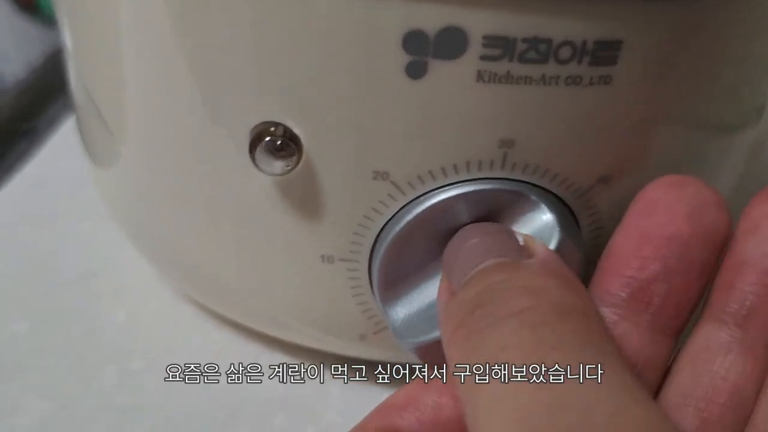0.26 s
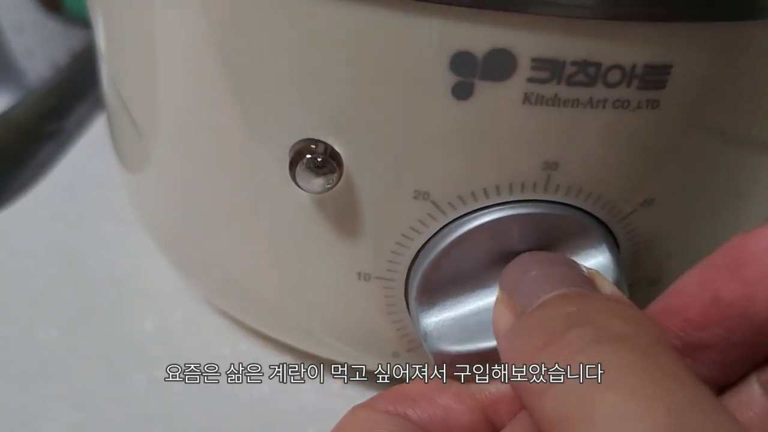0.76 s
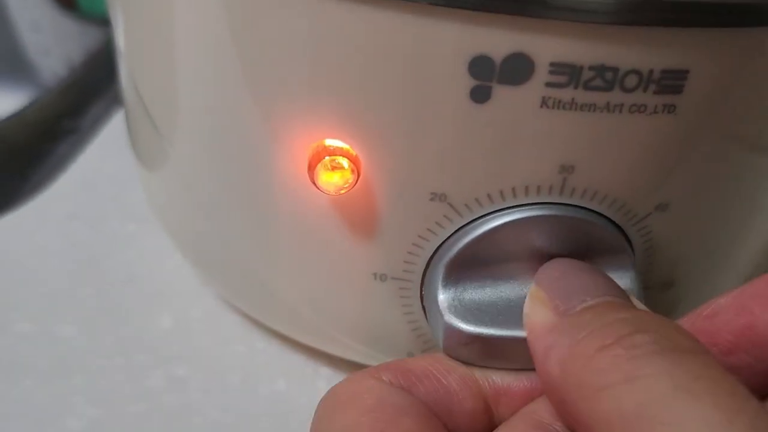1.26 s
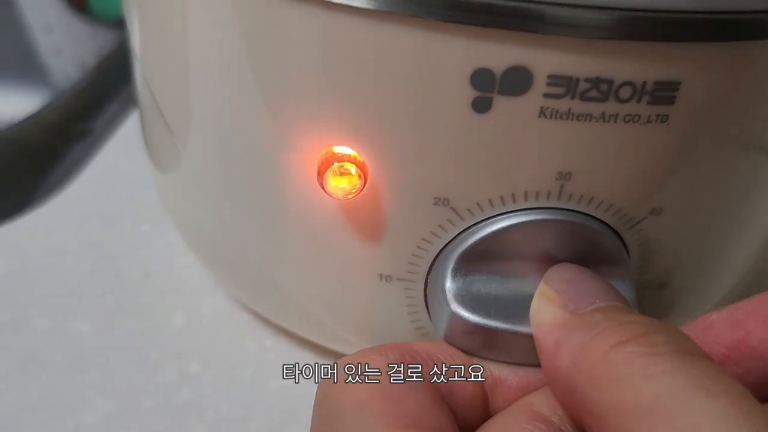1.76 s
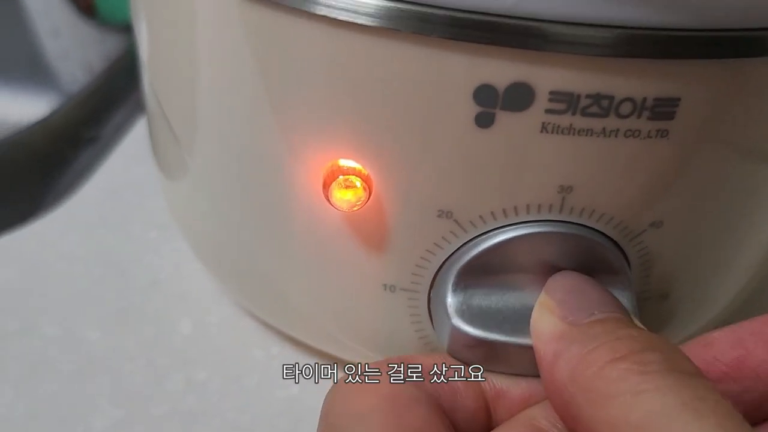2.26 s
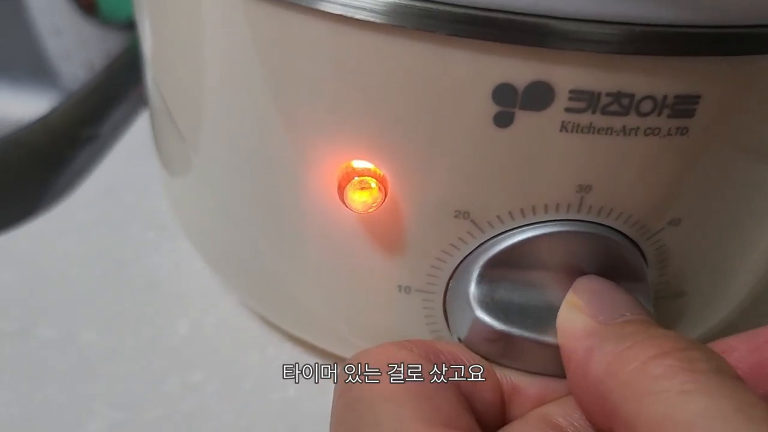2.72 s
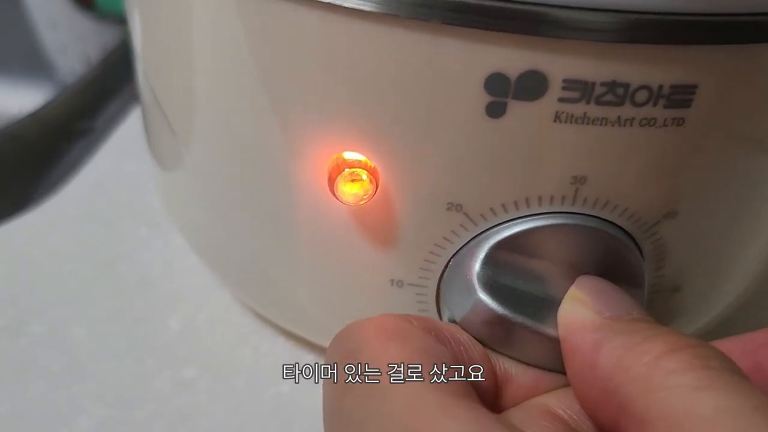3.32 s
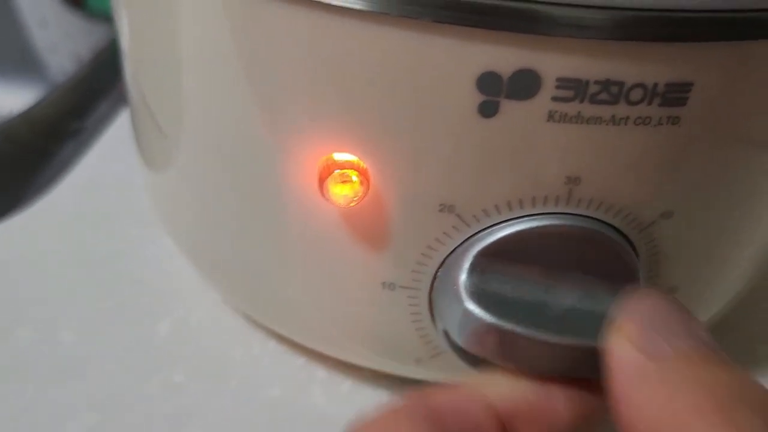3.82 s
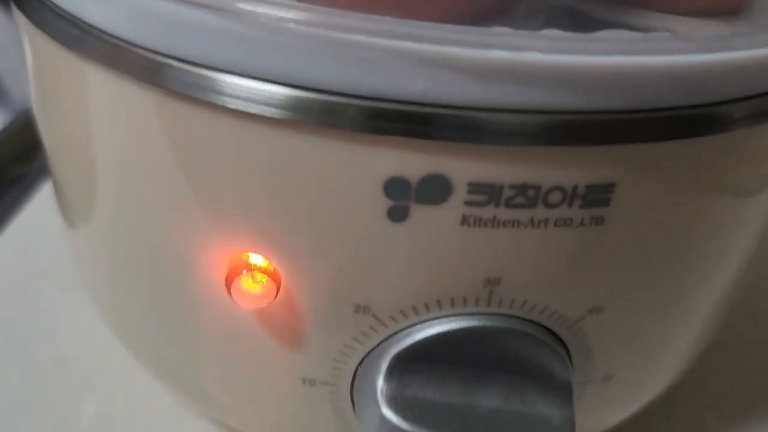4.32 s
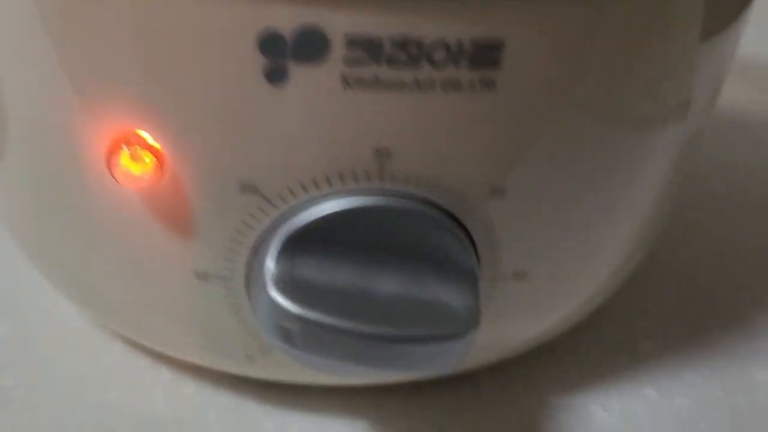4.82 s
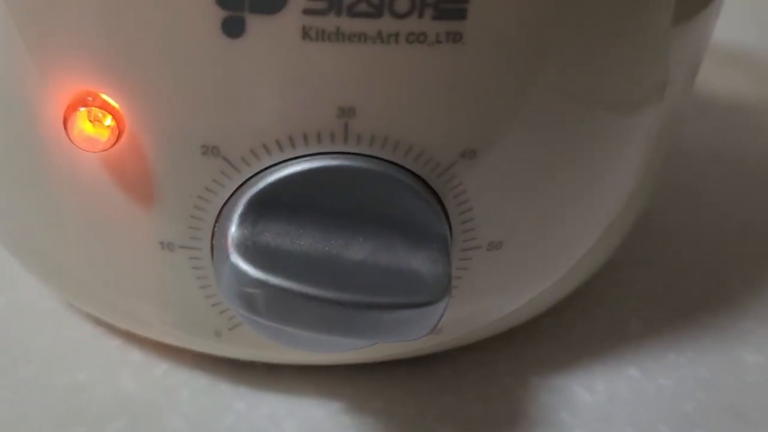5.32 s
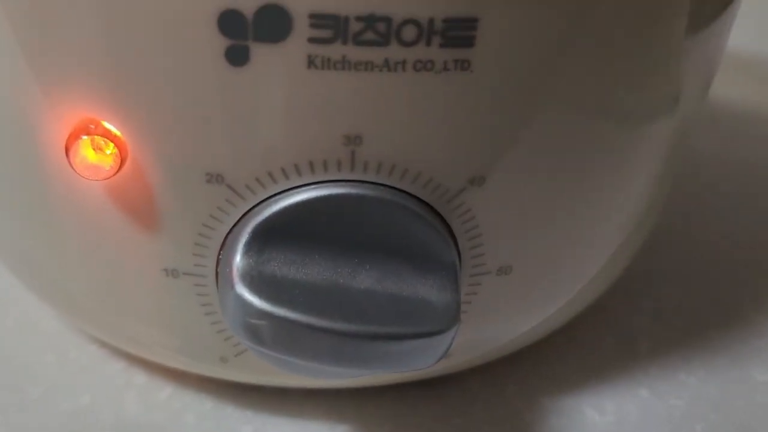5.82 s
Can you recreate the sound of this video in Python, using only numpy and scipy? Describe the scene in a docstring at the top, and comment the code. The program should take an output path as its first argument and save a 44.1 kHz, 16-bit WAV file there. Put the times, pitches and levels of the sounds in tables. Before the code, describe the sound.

A faint appliance hum and hiss run throughout in a quiet kitchen. At about 0.2 seconds a hand grazes the microphone on the left with a tiny squeak. From 0.5 seconds the clockwork timer of a small plastic cooker is wound close by: crisp ratchet clicks in short bursts, each lightly knocking the hollow case. These are the loudest sounds. They come thickly until 1.1 seconds, then in separate twists until 2 seconds. After a pause with a couple of faint ticks, more twists follow from 2.7 to 3.5 seconds. Near 3.7 seconds the timer starts ticking quietly, nearly four times a second, and keeps going to the end. Fingers scuff faintly off the dial around 3.8 seconds. Between 4.6 and 5 seconds a hand brushes and bumps the microphone with another faint squeak, and soft low bumps return near 6 seconds.

```python
"""An appliance hums in a kitchen. A hand grazes the left microphone, with a faint squeak. From half a second
in, the clockwork timer of a small plastic cooker is wound close by in short twists: a catch (the pawl) snaps
over the ratchet teeth and knocks the hollow case. The escapement, which lets the gears move one step at a time,
beats once or twice while the dial rests; near 3.7 seconds it ticks steadily and quietly, and the fingers let go
of the dial. Last, the hand brushes and bumps the microphone, and a second faint squeak is heard."""
import sys
import numpy as np
from scipy import signal
from scipy.fft import rfft, irfft, next_fast_len
from scipy.io import wavfile
from scipy.ndimage import uniform_filter1d

SR = 44100
rng = np.random.default_rng(int(sys.argv[2]) if len(sys.argv) > 2 else 0)


def bounce(signal):
    """Save signal as a 16-bit WAV file at the path given by the first command-line argument."""
    frames = np.transpose(np.atleast_2d(signal))
    limited = np.clip(frames, -1, 1)
    pcm = np.round(limited * 32767).astype(np.int16)
    wavfile.write(sys.argv[1], SR, pcm)


N = 267687
TIME = np.arange(N) / SR

# Tone colours of the room, sliding skin, a tick and a pawl snap.
# Each row: frequency in Hz, relative left and right levels in dB.
ROOM_TONE = [(24.8, -29, -29), (89, 0.5, 4), (147, -4, -1), (337, -13, -15.5), (367, -11.5, -4),
             (625, -20.5, -24), (1270, -33.5, -30.5), (1847, -10, -12.5), (2780, -28.5, -14.5),
             (3680, -61, -26), (6250, -31, -29.5), (6540, -26, -26), (11300, -32, -31.5), (15900, -34, -37)]
SKIN_TONE = [(300, -57, -58), (1130, -20, -56), (2220, 1.5, -13), (3500, -2, -24), (7360, -5, -29),
             (9100, -10.5, -24), (13600, 0, -36), (16600, -14, -49)]
TICK_TONE = [(294, -13, -14.5), (940, -25.5, -51), (1820, 2, -5), (3370, -23.5, -7.5), (4820, -6, -2),
             (5500, -13, -6.5), (8000, -12.5, -3), (10000, -23, -25.5), (11100, -15.5, -2),
             (15700, -21, -60)]
PAWL_TONE = [(150, -21.5, -18.5), (490, -21, -21.5), (1074, -19.5, -30), (1503, -3, -17),
             (2425, -2.5, -3.5), (3080, -23, -4.5), (4320, -1, 4), (6040, -7, -3.5), (7400, -8.5, 1.5),
             (9790, -21.5, -16.5), (12510, -9.5, -6), (16500, -24.5, -44)]
# Mains hum. Each row: pitch in Hz, relative left and right levels in dB.
HUM_NOTES = [(59.2, -71, -64.5), (118.4, -72, -67.5), (177.6, -82, -77), (236.8, -83, -78),
             (473.7, -85, -80), (536, -95, -86)]
# Thin whines in the room. Each row: pitch in Hz, width in Hz, level in dB.
WHINE_BANDS = [(2850, 10, -79.5), (3370, 25, -78), (4444, 110, -77.5), (6160, 36, -113), (7220, 29, -84.5),
               (8300, 150, -93), (10500, 130, -94)]
# Hand strokes. Each row: start and length in seconds, relative final level in dB, growth in dB.
HAND_STROKES = [(0.19, 0.084, -72.5, 1), (4.601, 0.078, -48, 12), (4.692, 0.0074, -42, 4),
                (4.84, 0.018, -67, 0), (4.935, 0.068, -61.5, 5.5)]
# Squeaks. Each row: start and length in seconds, first and last pitch in Hz, level in dB.
SQUEAK_GLIDES = [(0.231, 0.032, 3170, 2800, -53.5), (4.885, 0.024, 3040, 2850, -55.5),
                 (4.892, 0.034, 2670, 2450, -57)]
# Light clicks of the clockwork: gears taking up slack, and near 2.06 and 2.31 s a lone tock and tick # of the
# escapement while the dial rests. Each row: start in seconds, level, body and crack in dB, ping pitch in Hz. #
# "Body" boosts a snap below 3 kHz, "crack" boosts it above 6 kHz. Snap levels are relative.
LIGHT_CLICKS = [(0.5252, -50.5, 6, 2, 4070), (0.5335, -42.5, 5, -3, 4340), (1.4892, -53.5, -8, -10, 4400),
                (1.7428, -49, 11, 2, 4000), (2.0599, -52.5, -5, -11, 4100), (2.3058, -42.5, -3, 3, 2090),
                (2.657, -53, 24, -19, 2420), (3.317, -51, -1, -14, 2540), (3.4589, -55, -15, 0, 4300)]
# Where dial and case ring. Each row: pitch in Hz, width in Hz, left and right boost in dB.
CASE_RINGS = [(652, 30, 15.5, 13.5), (940, 227, 13, 16.5), (1665, 83, -0.5, 18.5), (1773, 81, 5.5, -0.5),
              (2098, 143, 10, 6.5), (2584, 420, -15.5, 12.5), (2942, 206, 25, 4.5), (3180, 17, 5, 5.5),
              (3607, 630, 14, 4.5), (4134, 44, 6.5, 2), (5880, 125, 6.5, -23), (7030, 540, 7, -21),
              (8830, 880, 9.5, -3.5), (11180, 1200, 7.5, -4.5)]
# Twists of the dial. Each row: start and length in seconds, teeth passed (rounded), speed-up from
# -1 to 1, level, body and crack in dB, ping pitch in Hz, knock on the case in dB.
DIAL_TWISTS = [(0.5385, .008, 2, 0, -26, 4, 0.5, 4230, -50), (0.633, 0, 1, 0, -28, -2, -5.5, 4440, -54),
               (0.6803, 0.042, 5, -.3, -27, 5, 6, 2560, -49.5),
               (0.7364, 0.019, 3, 0, -27.5, 3.5, 5, 4300, -45.5),
               (0.815, 0, 1, 0, -26.5, 8.5, 9, 4060, -49),
               (0.836, 0.051, 5, 0.16, -27.5, 1.7, 4.5, 4220, -48.5),
               (0.918, .0277, 3, -.15, -27, 2.5, 2.5, 4100, -49.5),
               (0.9658, 0.048, 5, 0.17, -26.5, 4, 2.5, 2770, -45.5),
               (1.058, 0, 1, 0, -28.5, 2, 6.5, 3950, -53),
               (1.082, 0.026, 5, 0.38, -25, 2.5, -1.5, 4030, -50.5),
               (1.112, .032, 5, -.5, -23.5, 4.5, 5, 2680, -45),
               (1.3859, 0.044, 4, -0.28, -27.5, 1.5, 1, 4100, -47.5),
               (1.5717, 0.039, 3, -0.049, -27, 0, -1, 4400, -51.5),
               (1.6986, 0, 1, 0, -26, -1, -2.5, 3970, -55),
               (1.7543, 0.043, 4, 0.21, -28, 1, -0.5, 4450, -50.5),
               (1.8156, 0, 1, 0, -28.5, 3, 1.5, 2520, -46.5), (1.9095, .0459, 3, .04, -29, 3, 2, 2600, -53),
               (2.6614, 0, 1, 0, -30.5, -0.5, -3.5, 2550, -60),
               (2.7346, 0.031, 3, 0.15, -29.5, 1, -2.5, 2440, -56.5),
               (2.7989, 0, 1, 0, -29, 1, 2, 4640, -47.5),
               (2.8342, .0071, 1.78, 0, -25.5, -0.5, -4, 3600, -45.5),
               (2.8471, 0.033, 5, -.35, -28.5, 4, 5.5, 3960, -42),
               (3.1109, 0, 1, 0, -31.5, 0.5, 2.5, 2350, -59),
               (3.3219, 0.038, 4, 0.038, -30, 0, 0.5, 2430, -52.5),
               (3.467, 0.01, 2, 0, -33, 2.5, -2, 3970, -51)]
# Low notes of the hollow case. Each row: pitch in Hz, relative level in dB, seconds to fade by 60 dB.
CASE_NOTES = [(245.4, 3, 0.14), (270, -22, 0.12), (352.4, -7.5, 0.13), (401.4, -10.5, 0.16),
              (432, -13.5, 0.097), (656, -7, 0.036), (850, -4.5, 0.031)]
# The escapement's two arms, tick and tock. Each row: level, body and crack in dB, ping pitch in Hz.
TICK_AND_TOCK = [(-49, -7, 5, 4350), (-51, -8, -3, 3900)]
# Finger scuffs and hand bumps. Each row: start and length in seconds, pitch in Hz, level in dB.
FINGER_SCUFFS = [(3.825, 0.025, 2560, -58), (3.835, 0.05, 2220, -60.5), (3.899, 0.011, 2830, -57)]
HAND_BUMPS = [(4.668, 0.062, 74.5, -60), (5.007, 0.058, 134, -59), (5.824, 0.078, 100, -56.5),
              (5.998, 0.048, 272, -67.5)]

LAG_S = .00018  # the timer's sound reaches the right microphone this much later


def from_db(db):
    """Turn decibels into a volume factor."""
    return 10 ** (np.asarray(db) / 20)


def rms_one(x):
    """Scale a sound to an average strength (rms) of 1."""
    return x / np.sqrt(np.mean(x ** 2) + 1e-20)


def colour_db(points, size):
    """Join the rows of a tone colour into left and right dB curves."""
    hz, *sides = np.transpose(points)
    grid = np.maximum(np.fft.rfftfreq(size, 1 / SR), 1)
    return np.array([np.interp(np.log(grid), np.log(hz), side) for side in sides])


def ring_filter(db, size):
    """Turn a dB curve into a filter that rings only after the blow (minimum phase)."""
    cepstrum = irfft(np.log(from_db(db)), size)
    cepstrum[..., 1:size // 2] *= 2
    cepstrum[..., size // 2 + 1:] = 0
    return np.exp(rfft(cepstrum))


def add(out, sound, start):
    """Mix a sound in at a start time in seconds."""
    part = out[..., max(int(start * SR), 0):][..., :sound.shape[-1]]
    part += sound[..., :part.shape[-1]]


def coloured_noise(points, alike_below_hz):
    """Stereo noise with a tone colour; long waves reach both microphones alike."""
    size = next_fast_len(N, real=True)
    alike = 1 / (1 + (np.fft.rfftfreq(size, 1 / SR) / alike_below_hz) ** 2)
    white = rfft(rng.standard_normal((3, size)))
    mixed = np.sqrt(alike) * white[0] + np.sqrt(1 - alike) * white[1:]
    return rms_one(irfft(mixed * from_db(colour_db(points, size)), size)[:, :N])


def filtered(x, order, hz, kind):
    """Keep the low, high or middle ("band") part of a sound."""
    return signal.sosfilt(signal.butter(order, hz, kind, fs=SR, output="sos"), x)


def narrow_noise(hz, width_hz):
    """Stereo noise around one pitch."""
    edges = [hz - width_hz / 2, hz + width_hz / 2]
    return rms_one(filtered(rng.standard_normal((2, N)), 2, edges, "band"))


def swell(start, length):
    """The volume of a short touch: it rises quickly and fades."""
    progress = np.clip((TIME - start) / length, 0, 1)
    return np.sin(np.pi * np.sqrt(progress))


def room(split_hz=750, rise_db_per_s=0.9):
    """Rumble and mains hum grow slowly under a steady hiss and thin whines."""
    growth = from_db(rise_db_per_s * (TIME - TIME[-1]))
    air = coloured_noise(ROOM_TONE, alike_below_hz=320)
    rumble = from_db(-66) * rms_one(filtered(air, 3, split_hz, "low"))
    hiss = from_db(-67.5) * rms_one(filtered(air, 3, split_hz, "high"))
    hum = sum(from_db([[left], [right]]) * np.sqrt(2) * np.sin(2 * np.pi * (hz * TIME + rng.random()))
              for hz, left, right in HUM_NOTES)
    whine = sum(from_db(db) * narrow_noise(hz, width) for hz, width, db in WHINE_BANDS)
    return growth * (rumble + from_db(1.2) * hum) + hiss + whine


def hand_brush(grain, grain_db=-2.0, land_db_per_s=900, lift_db_per_s=710):
    """Skin lands on the microphone, slides with a grainy hiss and lifts off."""
    volume = np.zeros(N)
    for start, length, final_db, growth_db in HAND_STROKES:
        before, after = np.maximum(start - TIME, 0), np.maximum(TIME - start - length, 0)
        pressure_db = np.interp(TIME, [start, start + length], [final_db - growth_db, final_db])
        volume += from_db(pressure_db - land_db_per_s * before - lift_db_per_s * after)
    return volume * from_db(grain_db * grain) * coloured_noise(SKIN_TONE, alike_below_hz=2300)


def squeaks(grain, wobble=0.05):
    """Short falling tones whose pitch wobbles with the grain of the sliding skin."""
    out = np.zeros(N)
    for start, length, first_hz, last_hz, db in SQUEAK_GLIDES:
        pitch = np.interp(TIME, [start, start + length], [first_hz, last_hz]) * (1 + wobble * grain)
        out += from_db(db) * swell(start, length) * np.sin(2 * np.pi * np.cumsum(pitch) / SR)
    return out


def snaps(rows, colour, rise_s, snap_s, ring_s, ring_db, slip, ping_db, ping_cycles, direct_s):
    """A catch slips and strikes: its spring pings and the plastic rings on."""
    size, lead = 4096, SR // 200  # samples in one snap, and before its strike
    t, hz = (np.arange(size) - lead) / SR, np.fft.rfftfreq(size, 1 / SR)
    peaks = sum(np.array([[left], [right]]) / (1 + (2 * (hz - centre) / width) ** 2)
                for centre, width, left, right in CASE_RINGS)
    case_db = colour_db(colour, size) + peaks
    lows, highs = 1 / (1 + (hz / 3000) ** 8), 1 - 1 / (1 + (hz / 6000) ** 8)
    loud_part = slice(lead - SR // 1000, lead + SR // 200)
    after, lag = np.maximum(t, 0), np.array([[0], [LAG_S]])
    decay = np.exp(-after / snap_s) + from_db(ring_db) * np.exp(-after / ring_s)
    alike = np.exp(-after / direct_s)  # both sides hear the same strike, then the ring scatters
    ping_age = np.maximum(t + .0005 - lag, 0)  # the spring sets off just before the strike
    ping_gain = from_db(ping_db + np.array([[-3], [0]]))
    out = np.zeros((2, N))
    for start, level_db, body_db, crack_db, ping_hz, *_ in rows:
        # a slow slip builds up longer and cracks less
        rise = np.exp(np.minimum(t, 0) / (rise_s * from_db(-slip * crack_db)))
        shared = np.sqrt(alike) * rng.standard_normal(size)
        scattered = np.sqrt(1 - alike) * rng.standard_normal((2, size))
        rattle = rfft((shared + scattered) * rise * decay) * np.exp(-2j * np.pi * hz * lag)
        # a hard contact feeds all frequencies evenly
        rattle /= np.sqrt(uniform_filter1d(np.abs(rattle) ** 2, size=110))
        snap = irfft(rattle * ring_filter(case_db + body_db * lows + crack_db * highs, size))
        snap /= np.sqrt(np.mean(snap[:, loud_part] ** 2))
        # the ping swells for a few cycles, so a lower one lasts longer
        progress = ping_age * ping_hz / ping_cycles
        snap += ping_gain * progress * np.exp(1 - progress) * np.sin(2 * np.pi * ping_hz * ping_age)
        snap /= np.sqrt(np.mean(snap[:, loud_part] ** 2))
        add(out, from_db(level_db) * snap, start - lead / SR)
    return out


def clockwork_ticks(rows):
    """Gears or escapement strike lightly and set the plastic ringing."""
    return snaps(rows, TICK_TONE, rise_s=0.0003, snap_s=0.0037, ring_s=0.012, ring_db=0,
                 slip=1.5, ping_db=2.5, ping_cycles=4.0, direct_s=0.0009)


def pawl_drops(level_spread_db=0.9, crack_spread_db=3.57, pitch_spread=0.013, last_ping_hz=2560):
    """List the drops as each twist drags the pawl over the teeth, no two alike."""
    rows = []
    for start, length, count, speed_up, level_db, body_db, crack_db, ping_hz, knock_db in DIAL_TWISTS:
        for progress in np.linspace(0, 1, round(count)):
            when = start + length * (progress + speed_up * np.sin(np.pi * progress) / np.pi)
            strength, hardness, detune = rng.standard_normal(3)
            # the last tooth of a run catches the spring at its lower note
            hz = (last_ping_hz if progress == 1 else ping_hz) * (1 + pitch_spread * detune)
            rows.append((when, level_db + level_spread_db * strength, body_db,
                         crack_db + crack_spread_db * hardness, hz, knock_db))
    return rows


def ratchet(drops):
    """The pawl snaps sharply off each tooth."""
    return snaps(drops, PAWL_TONE, rise_s=0.00082, snap_s=0.0013, ring_s=0.0082, ring_db=-3.0,
                 slip=0.64, ping_db=3.0, ping_cycles=2.74, direct_s=0.0015)


def case_boom(drops, uneven_db=4.0):
    """Each drop of the pawl also rocks the hollow case, which rings with low notes."""
    starts, *_, knock_db = np.transpose(drops)
    out = np.zeros(N)
    for hz, note_db, fade_s in CASE_NOTES:
        kicks = np.full(N, 1e-18)
        kick_db = knock_db + note_db + uneven_db * rng.standard_normal(len(starts))
        kicks[(starts * SR).astype(int)] = from_db(kick_db)
        # each kick starts a fading tone
        decay, cosine = from_db(-60 / (fade_s * SR)), np.cos(2 * np.pi * hz / SR)
        out += signal.lfilter([1, -decay * cosine], [1, -2 * decay * cosine, decay ** 2], kicks)
    out = filtered(out, 4, [212, 950], "band")
    return np.array([out, np.interp(TIME - LAG_S, TIME, out)])


def escapement_beats(count=9, first_s=3.6736, beat_s=.2695, slowing_s=.00126, limp_s=.0012):
    """List the beats as two arms strike in turn, slowing a little, the tock slightly early."""
    rise_db_per_s = 2  # clearer as the hand leaves and the microphone comes closer
    rows = []
    for beat in range(count):
        since = beat * beat_s + slowing_s * beat * (beat - 1) / 2 - limp_s * (beat % 2)
        level_db, *tone = TICK_AND_TOCK[beat % 2]
        rows.append((first_s + since, level_db + rise_db_per_s * since, *tone))
    return rows


def finger_scuffs():
    """Fingers rub the dial as they let go."""
    return sum(from_db(db) * swell(start, length) * narrow_noise(hz, width_hz=1030)
               for start, length, hz, db in FINGER_SCUFFS)


def hand_bumps():
    """The hand holding the microphone makes soft, low thuds."""
    return sum(from_db(db) * swell(start, length) * narrow_noise(hz, width_hz=hz)[0]
               for start, length, hz, db in HAND_BUMPS)


def kitchen_echo(x, fade_s=0.23, dull_hz=7200, echo_db=-16.0):
    """Sound bounces around the kitchen and comes back a little duller."""
    t = TIME[:SR // 2]
    tail = rng.standard_normal((2, len(t))) * from_db(-60 * t / fade_s) * (t > .008)
    tail = filtered(tail / np.sqrt(np.sum(tail[0] ** 2)), 1, dull_hz, "low")
    return from_db(echo_db) * signal.fftconvolve(x, tail, axes=1)[:, :N]


def scene():
    """Mix the timer and the hand with their echo and the room."""
    drops = pawl_drops()
    near = from_db(-0.78) * ratchet(drops)
    near += from_db(-0.06) * clockwork_ticks(LIGHT_CLICKS + escapement_beats())
    near += case_boom(drops)
    grain = rms_one(uniform_filter1d(rng.standard_normal(N), size=60))  # roughness of sliding skin
    near += hand_brush(grain) + finger_scuffs() + hand_bumps() + squeaks(grain)
    return near + kitchen_echo(near) + room()


def record(dry):
    """Cut the treble steeply above 16.3 kHz."""
    return signal.sosfilt(signal.ellip(10, .1, 70, 16300, fs=SR, output="sos"), dry)


dry = scene()
out = record(dry)
bounce(out)
```